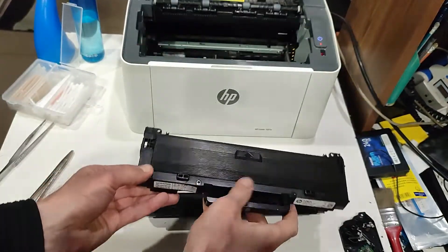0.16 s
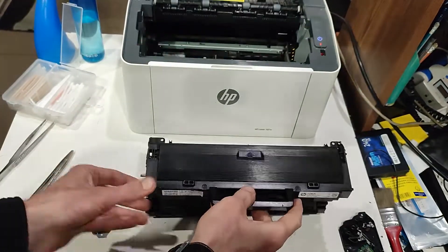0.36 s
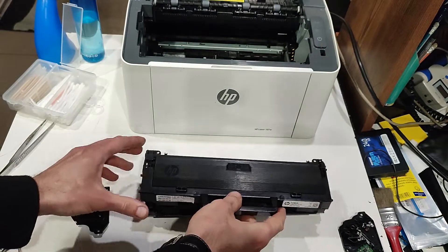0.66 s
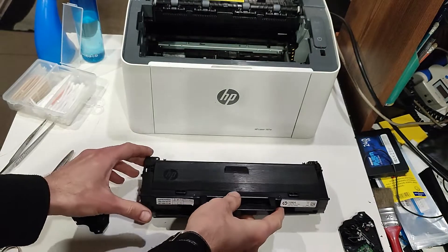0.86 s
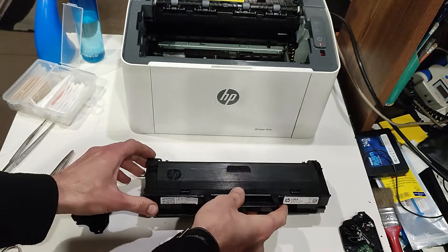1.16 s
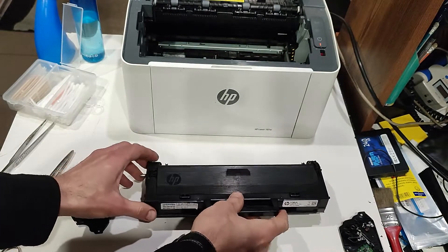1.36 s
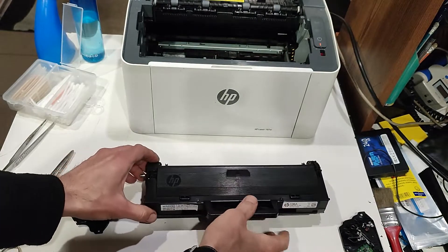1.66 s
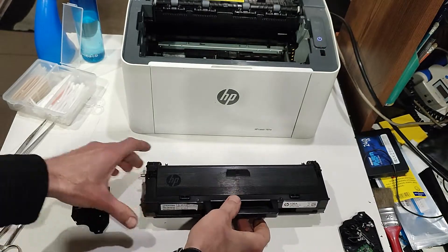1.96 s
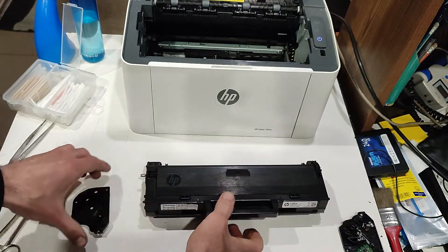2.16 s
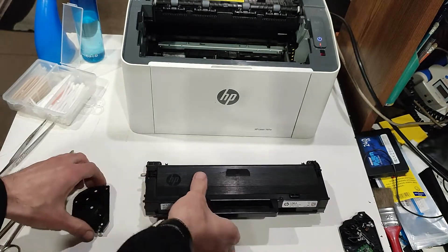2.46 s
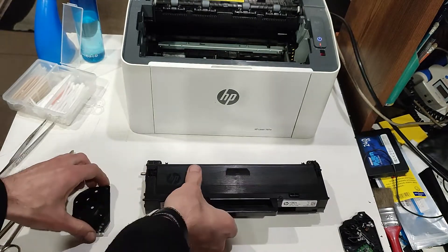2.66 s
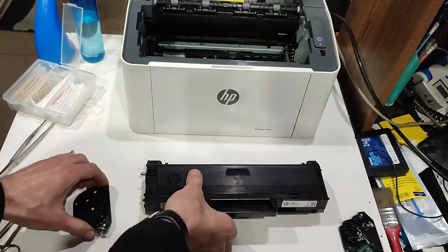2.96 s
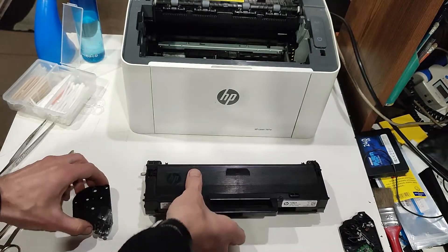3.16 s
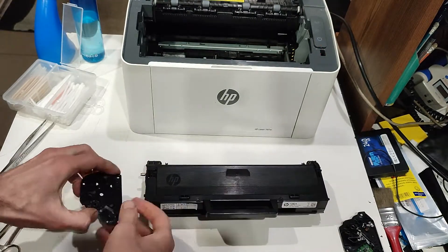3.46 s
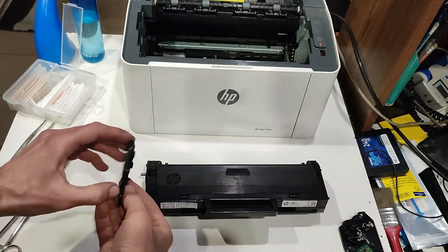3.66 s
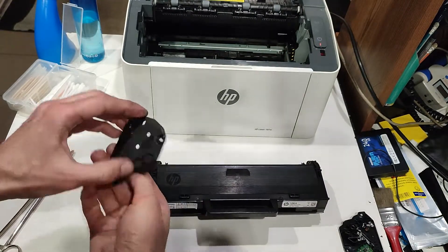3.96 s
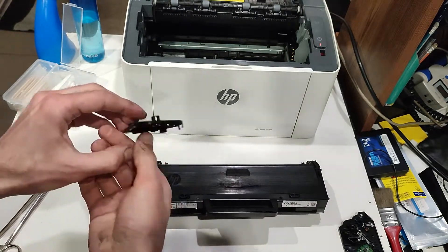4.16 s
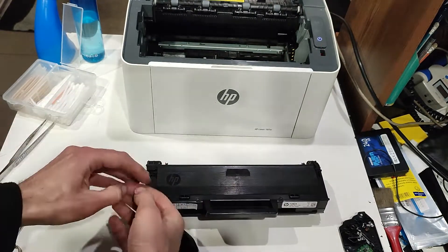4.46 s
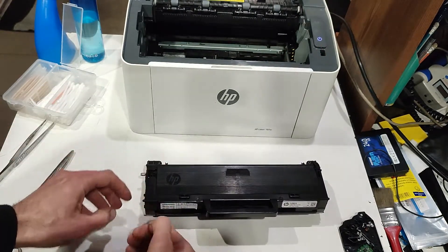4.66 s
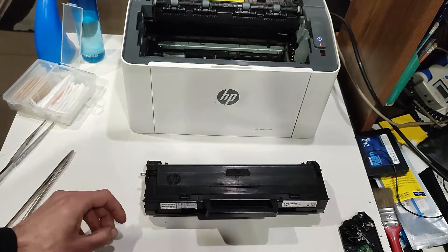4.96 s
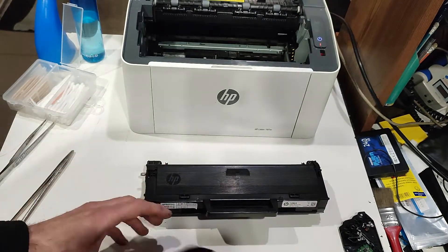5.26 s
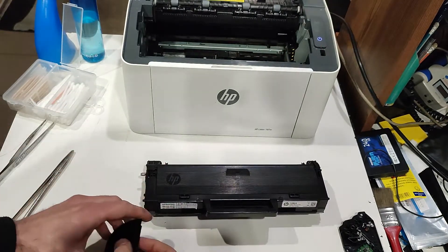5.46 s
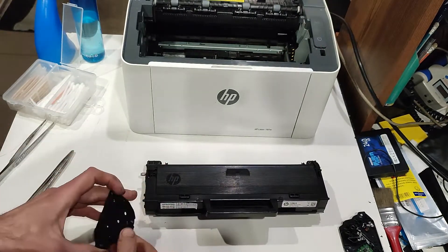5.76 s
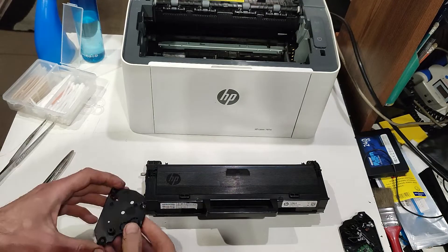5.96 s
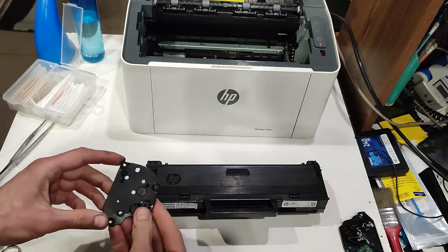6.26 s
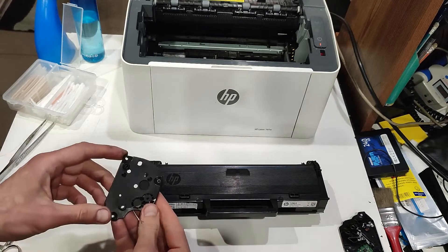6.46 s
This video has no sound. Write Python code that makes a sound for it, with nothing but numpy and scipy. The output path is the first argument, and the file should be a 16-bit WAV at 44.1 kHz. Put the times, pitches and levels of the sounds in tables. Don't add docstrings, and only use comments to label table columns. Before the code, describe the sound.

In a quiet room with a faint hum, hands fit a hollow plastic cartridge together on a desk: dull knocks quicken into one firm snap. Skin and sleeves rustle softly. A small plastic cover is nudged with faint ticks, then drops with a loud clack, bounces and rattles to rest before being picked up with a small knock. Close microphone, short dense echoes.

```python
import sys
import numpy as np
from scipy import signal
from scipy.fft import rfft, irfft
from scipy.io import wavfile
from scipy.ndimage import uniform_filter1d

SR = 44100
rng = np.random.default_rng(int(sys.argv[2]) if len(sys.argv) > 2 else 0)


def invert_db(level):
    return 10 ** (np.asarray(level, dtype=float) / 20)


def to_wav(sig):
    pcm = np.clip(np.atleast_2d(sig), -1, 1) * 32767
    pcm = np.round(pcm).astype(np.int16)
    wavfile.write(sys.argv[1], SR, pcm.T)


N = 291060


def at_hz(points, hz):
    table_hz, value = np.transpose(points)
    return np.interp(np.log(hz), np.log(table_hz), value)


def rms_one(x):
    return x / np.sqrt(np.mean(x ** 2) + 1e-20)


def band(x, low_hz, high_hz):
    return signal.sosfilt(signal.butter(2, [low_hz, high_hz], "band", fs=SR, output="sos"), x)


def drift(rate_hz):
    points = rng.standard_normal(400)
    return np.interp(np.arange(N) / SR * rate_hz, np.arange(400), points)


# f/Hz, level/dB per Hz
AIR_SPECTRUM = [(35, -30), (60, -6.5), (79, -14), (102, -14.5), (177, -17.5), (233, -19.5), (360, -25),
                (700, -24), (767, -27), (1030, -27), (1880, -37), (4820, -45.5), (9370, -41.5),
                (11500, -49.5), (14500, -66)]
# f/Hz, level/dB rms
HUM_TONES = [(50, -66), (232, -77), (465, -88), (722, -85.5)]


def air():
    bins_hz = np.fft.rfftfreq(N, 1 / SR) + 1
    spectrum = rfft(rng.standard_normal(N)) * invert_db(at_hz(AIR_SPECTRUM, bins_hz))
    noise = invert_db(-70.5) * rms_one(irfft(spectrum, N))
    t = np.arange(N) / SR
    wavering_t = t + 0.018 * np.cumsum(drift(39)) / SR
    tones = np.zeros(N)
    for hz, db in HUM_TONES:
        tones += invert_db(db + 4.0 + 0.53 * drift(4.7)) * np.sin(2 * np.pi * hz * wavering_t)
    return noise + tones


# start t/s, length/s, skin slide level/dB, sleeve against skin level/dB
HAND_MOVES = [(-0.4, 2.02, -75.5, -4.5), (0.31, 0.076, -80, -8), (0.4, 0.11, -96, 5),
              (1.356, .09, -69.5, -2), (1.64, 0.081, -77, 2), (1.78, .09, -85, 3),
              (1.855, 0.37, -73.5, -4.5), (2.15, 0.29, -79, -6), (2.42, .06, -75.5, -3),
              (2.517, 0.091, -86, 6), (3.17, 0.47, -76, -7.5), (3.5, 0.37, -84.5, 9),
              (3.9, 0.26, -82.5, 10.5), (4.1, 0.13, -84, 8.5), (4.2, 0.088, -82, 2), (4.28, .12, -70.5, -9),
              (4.85, 0.17, -76.5, -9), (5.25, 0.19, -80, -9), (5.62, .13, -98, 21.5), (5.83, 0.17, -93, 16),
              (6.56, 0.19, -74, -10)]


def hands():
    edge_share = 0.85
    bumps_db, bumps_follow = -76.5, 0.45
    grain_db = 1.5 * rng.exponential(1, N)
    bump_noise, skin_noise, sleeve_noise = rng.standard_normal((3, N)) * invert_db(grain_db * [[0], [1], [1]])
    t, skin, sleeve = np.arange(N) / SR, np.zeros(N), np.zeros(N)
    for start_s, length_s, skin_db, sleeve_db in HAND_MOVES:
        to_edge_s = np.minimum(t - start_s, start_s + length_s - t)
        shape = np.clip(to_edge_s / (edge_share * length_s), 0, 1)
        skin += invert_db(skin_db + 1.5) * shape
        sleeve += invert_db(skin_db + sleeve_db + 2.0) * shape
    bumps = invert_db(bumps_db + 3.0 * drift(16)) * (skin / invert_db(-83.5)) ** bumps_follow
    layers = [(bump_noise, bumps, 90, 430), (skin_noise, skin, 1300, 5000), (sleeve_noise, sleeve, 6500, 13500)]
    out = np.zeros(N)
    for noise, gain, low_hz, high_hz in layers:
        out += gain * invert_db(2.7 * drift(30)) * rms_one(band(noise, low_hz, high_hz))
    return out


# t/s, level/dB
MOUNT_SWAY = [(0.0, -46.5), (0.55, -47), (1.1, -56.5), (1.82, -44.5), (2.48, -62), (2.54, -53), (3.1, -56),
              (3.2, -45), (3.73, -57), (3.88, -47), (4.06, -58), (4.49, -43.5), (4.59, -57), (5.07, -44.5),
              (5.51, -61.5), (5.86, -53), (5.99, -61.5), (6.6, -51.5)]


def sway():
    t_s, level_db = np.transpose(MOUNT_SWAY)
    rocking = band(band(rng.standard_normal(N + SR), 2.7, 16), 2.0, 30)[SR:]
    return invert_db(np.interp(np.arange(N) / SR, t_s, level_db)) * rms_one(rocking)


def ring(force, hz, t60_s):
    r, w = invert_db(-60 / (t60_s * SR)), 2 * np.pi * hz / SR
    return signal.lfilter([0, np.sin(w)], [1, -2 * r * np.cos(w), r * r], force + 1e-18)


def contacts(count, contact_ms):
    t = np.arange(1024) / SR
    rough = rng.standard_normal((count, 1024)) * np.exp(-t / (contact_ms / 1000))
    tones = rfft(rough)
    rough = irfft(tones / np.abs(tones) ** 0.8) * (t < 4 * contact_ms / 1000)
    return rough / np.sqrt(np.sum(rough ** 2, axis=1, keepdims=True))


REGISTER_BORDERS_HZ = [500, 1500, 3900]
REGISTER_TOPS_HZ = [700, 2200, 4600, 16000]


def body(blows, modes, contact_ms, ring_db, crack_db, dull_db, uneven_db, lowest_hz):
    s, shell_db, desk_db, hard_db, edge_db = np.transpose(blows)
    thud_db, knock_db = shell_db + desk_db, shell_db + hard_db
    levels_db = [thud_db, shell_db, knock_db, knock_db + edge_db]
    rough = contacts(len(s), contact_ms)
    luck = rng.standard_normal((len(s), 40))
    start = (s * SR).astype(int)
    where = start[:, None] + np.arange(1024)
    late = (rng.random((len(s), 40)) * contact_ms * 0.0008 * SR).astype(int)

    def scrape(db):
        return np.bincount(where.ravel(), (invert_db(db)[:, None] * rough).ravel(), N)[:N]

    def push(db, k):
        return np.bincount(start + late[:, k], invert_db(db), N)

    out = np.zeros((4, N))
    for k, (hz, mode_db, t60_s) in enumerate(modes):
        register = np.searchsorted(REGISTER_BORDERS_HZ, hz)
        db = levels_db[register] + mode_db + ring_db + uneven_db * luck[:, k]
        force = scrape(db) if register > 1 else push(db, k)
        out[register] += ring(force, hz, t60_s) * (-1) ** k
    cracks = [(dull_db, 140, 760), (dull_db + 5.5, 680, 1000), (crack_db, 1400, 4000), (crack_db + 3.5, 3700, 11000)]
    for register, (db, low_hz, high_hz) in enumerate(cracks):
        out[register] += invert_db(db) * band(scrape(levels_db[register]), low_hz, high_hz)
    total = np.zeros(N)
    for k, top_hz in enumerate(REGISTER_TOPS_HZ):
        total += (-1) ** k * band(out[k], lowest_hz, top_hz)
    return total


# t/s, level/dB, desk press/dB, hardness/dB, edge sharpness/dB
FITTING_BLOWS = [(0.284, -49.5, -29, -14, -3), (0.861, -61.5, -8, -3, -15), (0.889, -38, -5.5, -16, -24),
                 (1.012, -36.5, -5.5, -12, -20), (1.073, -56, 12, -6, -25), (1.149, -50.5, 8, -8, -13),
                 (1.178, -31.5, -0.5, -13.5, -22), (1.218, -42.5, -15, -18, -9), (1.228, -58, 18, -5, -12),
                 (1.266, -37.5, -28, 2.5, -13), (1.275, -30.5, -4, -13.5, -9), (1.286, -47, 4, -6, -3),
                 (1.402, -43.5, -8, -9, -3), (1.409, -34, 1, -2.5, -16), (1.415, -29, -8, -14, -5),
                 (1.424, -19, -6.5, -8.5, -4.5), (2.021, -73.5, 20.5, -4, -3), (2.076, -61, -9, 2, -16),
                 (2.441, -54.5, -7, -15, -2), (3.305, -63, 18, -6, -9), (3.437, -71.5, 26.5, 7, -10),
                 (3.457, -71, 2, 9, -24), (3.564, -75, 26, 0, -12), (4.016, -74, 21, 0, -9)]
# f/Hz, level/dB, t60/s
CARTRIDGE_MODES = [(110, -8, 0.12), (266, -2, 0.049), (390, -1, 0.053), (442, -4, 0.03), (572, 3, 0.027),
                   (780, 6.5, 0.0073), (897, -8.5, 0.051), (1040, -6.5, 0.031), (1356, -5, 0.015),
                   (1900, -13, 0.0067), (2600, -45, 0.004), (3440, -30, 0.048), (4350, -12, 0.0027),
                   (7500, -31, 0.0026)]


def cartridge_fitting():
    return body(FITTING_BLOWS, CARTRIDGE_MODES, contact_ms=4.0, ring_db=-8.5, crack_db=16, dull_db=21.0,
                uneven_db=2.5, lowest_hz=74.8)


# f/Hz, t60/s
ROOM_DECAY = [(120, 0.28), (400, 0.12), (1000, 0.19), (3000, 0.16), (8000, 0.13), (14000, 0.38)]
# f/Hz, level/dB
ROOM_SPECTRUM = [(120, -9), (400, -21.5), (1000, -19.5), (3000, -13.5), (8000, -21), (14000, -29.5)]


def room(x):
    t = np.arange(SR // 2) / SR
    edges_hz = 90 * 2 ** np.arange(0, 7.6, 0.5)
    white, tail = rng.standard_normal((2, len(t))), np.zeros(len(t))
    for k, (low_hz, high_hz) in enumerate(zip(edges_hz, edges_hz[1:])):
        hz = np.sqrt(low_hz * high_hz)
        decay_db = at_hz(ROOM_SPECTRUM, hz) - 60 * t / at_hz(ROOM_DECAY, hz)
        tail += band(white[k % 2], low_hz, high_hz) * invert_db(decay_db)
    tones = rfft(tail)
    power = np.abs(tones) ** 2
    fine = uniform_filter1d(power, size=11) + 1e-12
    broad = uniform_filter1d(power, size=601) + 1e-12
    tail = irfft(tones * np.sqrt(broad / fine)) * np.clip((0.3 - t) / 0.2, 0, 1) ** 2
    tail *= np.clip(t / 0.0013 - 0.5, 0, 1) * invert_db(-10.0)
    return signal.fftconvolve(x, tail)[:N]


# t/s, level/dB, desk/dB, hardness/dB, edge sharpness/dB
NUDGE_BLOWS = [(2.608, -42.5, -0.5, -7, -13), (2.615, -43, -9.5, -7.5, -5), (2.704, -52, -2.5, -12, -7),
               (2.738, -55.5, 4, -11.5, -10), (2.799, -58, 2.5, -23.5, -20), (2.85, -59, -16, -2.5, 6),
               (2.861, -48.5, 0, -12, -2), (2.914, -63, -14, -9, -10), (2.973, -61, -1, -16, -24),
               (3.027, -41, -4, 2.5, -14.5), (3.05, -64, 12, -8, -6), (3.084, -48, -6, -5, -18),
               (4.054, -76, 10, -11, -4), (4.079, -64.5, -4.5, -0.5, 2), (4.244, -73.5, 10, 1.5, -9),
               (4.314, -66, 2.5, -1.5, 0.5), (5.031, -53, 2, -4.5, -18), (5.059, -47.5, -3, -2.5, -29),
               (5.075, -49.5, -12, -6, -23)]
# f/Hz, level/dB, t60/s
COVER_MODES = [(256, -4.5, 0.033), (360, -2, 0.035), (420, 1, .03), (486, 1, 0.031), (620, -5, 0.025),
               (704, -4, 0.04), (883, -0.5, 0.027), (1090, -9, 0.028), (1230, -2, 0.013),
               (1506.4, -0.5, 0.01), (1849, -4.5, 0.036), (2020, 2, 0.0098), (2512, -13.5, 0.011),
               (3130, -6, 0.012), (3490, 0, 0.0067), (4040, 2, 0.021), (5960, -14, 0.025), (7080, -2, 0.01),
               (8926, -1, 0.012)]


def cover_nudged():
    return body(NUDGE_BLOWS, COVER_MODES, contact_ms=3.0, ring_db=-6.5, crack_db=18.5, dull_db=12.5,
                uneven_db=4.5, lowest_hz=257)


# t/s, level/dB, desk/dB, hardness/dB, edge sharpness/dB
DROP_BLOWS = [(4.383, -25.5, -14.5, 6, -4), (4.388, -12, -17.5, -8, -16), (4.396, -24, -5, 6, -1.5),
              (4.401, -16.5, -20.5, -3.5, -3.5), (4.409, -36, 2, 3, 0), (4.484, -38.5, -13.5, -11, 4),
              (4.497, -13.5, -17.5, -6, -21), (4.505, -13.5, -7.5, -12.5, -15.5),
              (4.578, -25.5, -4.5, -7.5, -2), (4.582, -15, -24, -9, -18.5), (4.604, -28.5, -22, 9, -5.5),
              (4.614, -21.5, -28, -8, 3), (4.623, -39, 8.5, 7.5, -7), (4.667, -27.5, -26, -6, 0.5),
              (4.678, -19.5, -9.5, -6.5, -3.5), (4.692, -29, -22, -12.5, 1.5), (4.712, -22, -8, -8.5, -1),
              (5.169, -41.5, 2, 6, 3.5), (5.173, -25.5, -0.5, -10.5, -7.5)]


def cover_dropped():
    return body(DROP_BLOWS + rattle(), COVER_MODES, contact_ms=2.5, ring_db=-7.5, crack_db=19.5, dull_db=12.0,
                uneven_db=4.0, lowest_hz=117)


def rattle():
    start_s, gap_s, level_db, loss_db, soften_db = 4.734, 0.012, -26.5, 2, 1.5
    desk_db, hard_db, edge_db = -12.5, -5, -16.5
    return [(start_s + gap_s * k, level_db - loss_db * k, desk_db,
             hard_db - soften_db * k, edge_db - soften_db * k) for k in range(6)]


def scene():
    background = air() + hands() + sway()
    cartridge, nudged, dropped = cartridge_fitting(), cover_nudged(), cover_dropped()
    echoes = room(invert_db(-4.5) * cartridge) + room(invert_db(-1.5) * nudged) + room(dropped)
    return (background + cartridge + nudged + dropped + echoes)[None]


def low_pass(x):
    return signal.sosfilt(signal.butter(12, 15010, fs=SR, output="sos"), x)


def record(dry):
    top_cut = signal.cheby2(8, 30, 15000, fs=SR, output="sos")
    mix = signal.sosfilt(top_cut, dry)
    return low_pass(mix)


dry = scene()
out = record(dry)
to_wav(out)
```